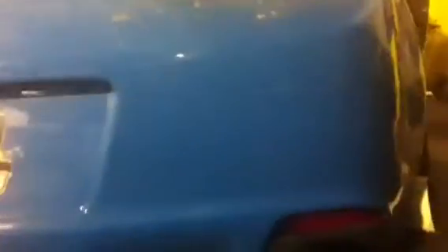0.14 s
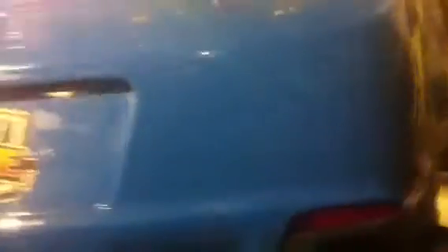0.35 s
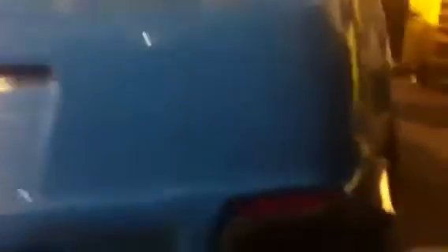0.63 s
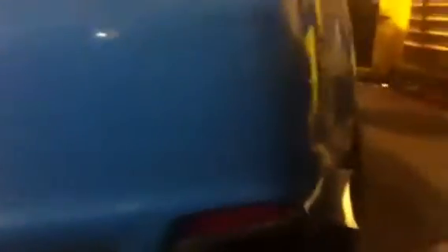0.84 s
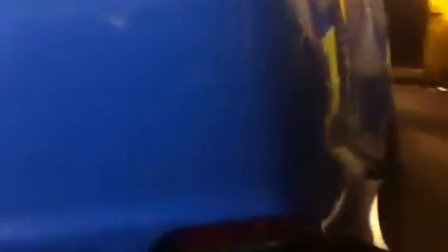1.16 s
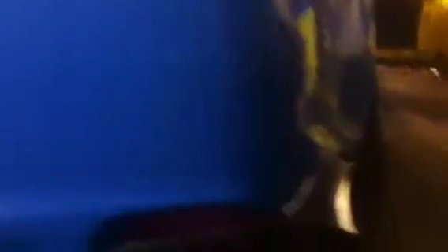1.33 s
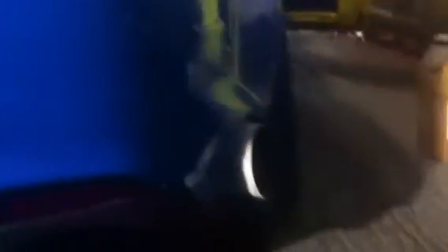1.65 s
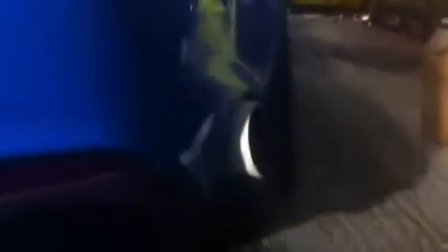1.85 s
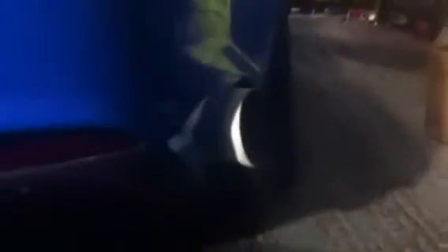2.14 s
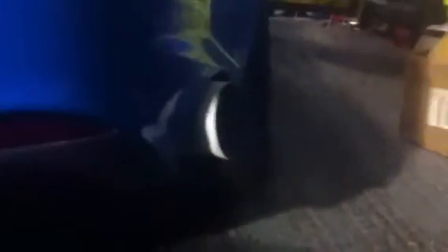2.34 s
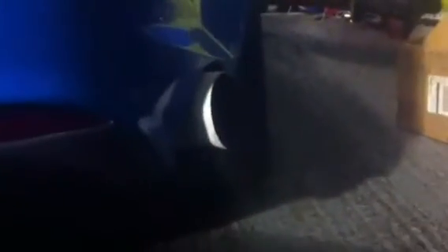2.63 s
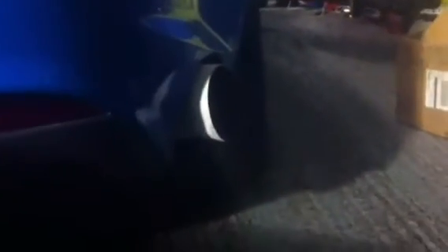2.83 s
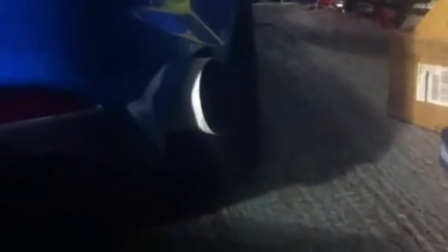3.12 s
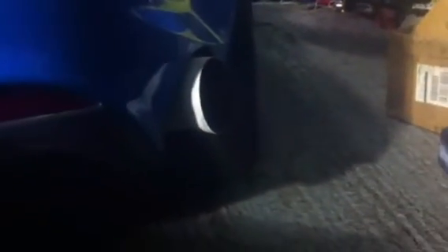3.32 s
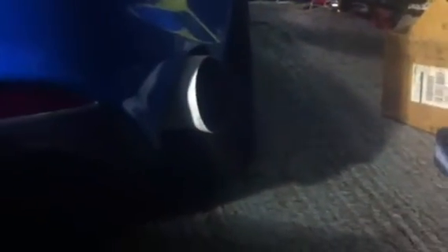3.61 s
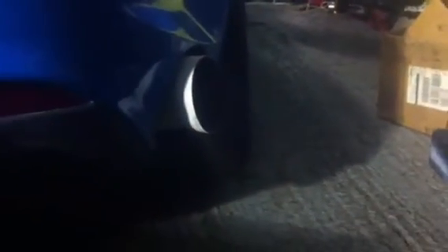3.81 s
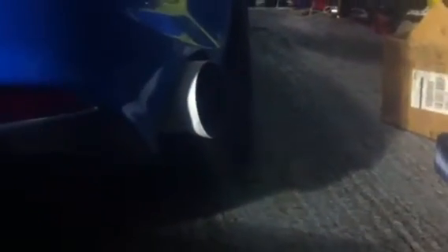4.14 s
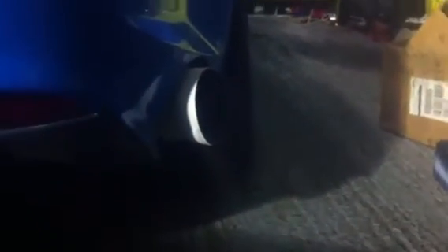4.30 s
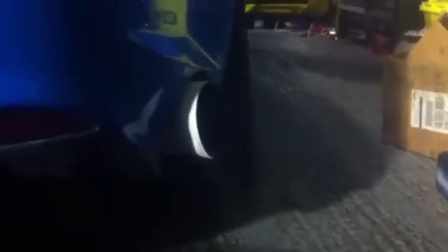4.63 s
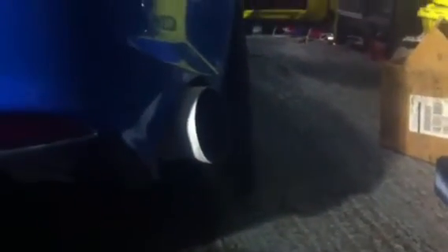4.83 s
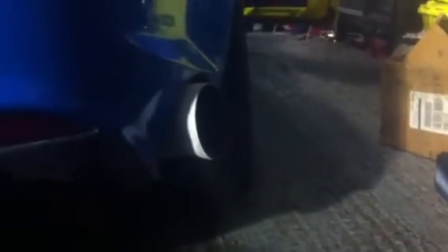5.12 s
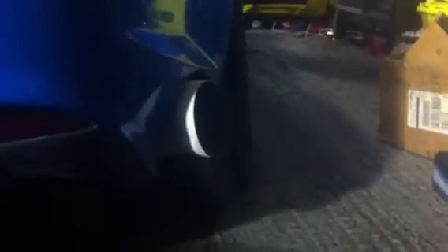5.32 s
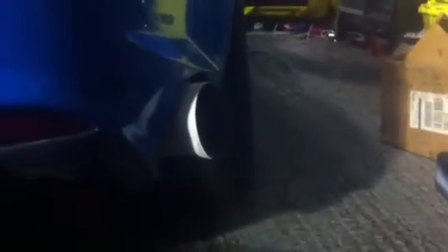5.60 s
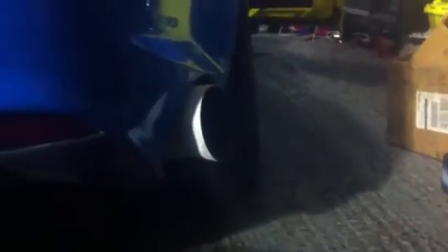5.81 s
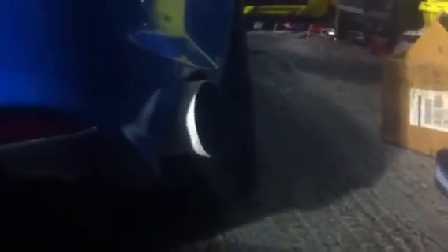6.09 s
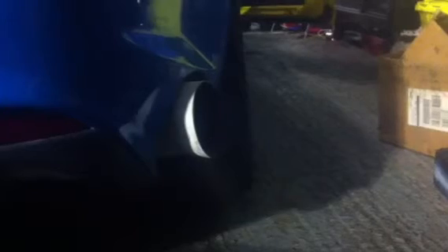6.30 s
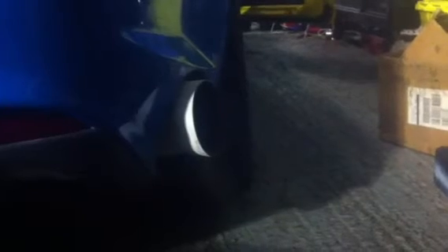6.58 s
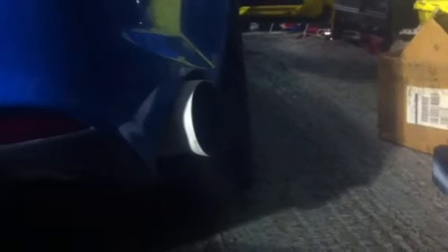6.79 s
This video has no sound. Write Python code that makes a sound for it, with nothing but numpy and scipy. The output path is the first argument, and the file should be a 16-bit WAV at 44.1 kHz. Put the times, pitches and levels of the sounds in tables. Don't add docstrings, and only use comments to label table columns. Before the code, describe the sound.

A rotary race engine idles lumpily throughout, in a concrete garage. From 0 to about 1 second the microphone is beside the car: dull, low exhaust thuds fire in quick clusters of two to four, blasts about 27 milliseconds apart, with brief skips between clusters and a hollow metallic pipe ring near 400 hertz. A soft air thump lands around 0.3. From 1 to 1.75 the microphone rounds the tail; the ring recedes and the thuds become deeper and more direct. It then stays behind the outlet until 7 seconds. The loping never settles into an even beat, stumbling notably around 3.2-3.6 and 5.3. Bright gas hiss pulses with the firing and flares irregularly, strongest near 4.5, 5.1, 5.4 and 6.3. Underneath run a noisy gear whirr with whines around 2 kilohertz, a faint wavering sheet-metal tone near 700 hertz, soft microphone buffeting and short wall reverberation. It ends still idling.

```python
import sys
import numpy as np
from scipy import signal
from scipy.fft import rfft, irfft, next_fast_len
from scipy.io import wavfile

SR = 44100
rng = np.random.default_rng(int(sys.argv[2]) if len(sys.argv) > 2 else 0)


def convert_level_to_amplitude(level_db):
    exponent = np.asarray(level_db, float) / 20
    return 10 ** exponent


def dump_mix(stems):
    frames = np.atleast_2d(stems).T
    limited = np.clip(frames, -1, 1)
    pcm = np.round(limited * 32767).astype(np.int16)
    wavfile.write(sys.argv[1], SR, pcm)


N = 306495
SLOT_S = .0137


def rms_one(x):
    return x / np.sqrt(np.mean(x ** 2) + 1e-20)


def butter(x, hz, kind, order=4):
    return signal.sosfilt(signal.butter(order, hz, kind, fs=SR, output="sos"), x)


def drift(rate):
    r = np.exp(-80 * np.pi * rate / SR)
    noise = rng.standard_normal(N // 40 + 2002)
    slow = signal.lfilter([1], [1, -2 * r, r * r], noise)[2000:]
    return np.interp(np.arange(N) / 40, np.arange(len(slow)), rms_one(slow))


def resonance(x, hz, width_hz):
    r = np.exp(-np.pi * width_hz / SR)
    feedback = [1, -2 * r * np.cos(2 * np.pi * hz / SR), r * r]
    return signal.lfilter(np.array([1, 0, -1]) * (1 - r * r) / 2, feedback, x)


def ring(x, hz, t60_s):
    r = convert_level_to_amplitude(-60 / (t60_s * SR))
    w = 2 * np.pi * hz / SR
    return signal.lfilter([0, np.sin(w)], [1, -2 * r * np.cos(w), r * r], x)


def coloured(points):
    size = next_fast_len(N)
    hz = np.maximum(np.arange(size // 2 + 1) * SR / size, 1)
    point_hz, point_db = np.array(points).T
    shape = convert_level_to_amplitude(np.interp(np.log(hz), np.log(point_hz), point_db))
    return rms_one(irfft(rfft(rng.standard_normal(size)) * shape, size)[:N])


def clicks(times, sizes):
    out = np.full(N, 1e-18)
    np.add.at(out, np.clip(np.round(times * SR).astype(int), 0, N - 1), sizes)
    return out


def bump(s, half_s):
    return np.exp(-((np.arange(N) / SR - s) / half_s) ** 2)


# time_s, place_share
WALK = [
    (0, 0.0086),
    (.8, 0.081),
    (1.2, 0.41),
    (1.5, 0.7),
    (1.75, 1),
    (6.95, 1),
]


def microphone_place():
    s, share = np.transpose(WALK)
    return np.clip(np.interp(np.arange(N) / SR, s, share), 0, 1)


# time_s, peak_db
THUMPS = [(0.317, -30), (0.602, -53), (0.766, -58), (1.05, -46), (1.216, -41), (1.326, -31.5), (1.683, -38),
          (2.229, -39), (2.418, -41), (2.74, -46), (2.811, -41), (2.97, -38), (3.127, -46), (3.366, -37),
          (3.529, -37), (3.985, -39), (4.127, -49), (4.447, -42), (4.649, -31), (5.092, -36), (5.655, -41),
          (6.002, -41), (6.314, -44), (6.718, -46)]


def buffet():
    s, db = np.transpose(THUMPS)
    push = ring(clicks(s + 0.015, convert_level_to_amplitude(db + 8)), 34, 0.075)
    rumble = butter(rng.standard_normal(N), [52, 80], "band", order=2)
    deep = butter(rng.standard_normal(N), 50, "low", order=2)
    return butter(push, 80, "low", order=2) + convert_level_to_amplitude(-56.5) * rms_one(rumble) + convert_level_to_amplitude(-60) * rms_one(deep)


# frequency_hz, density_db (per Hz)
GEAR_COLOUR = [(310, -42), (520, -2.5), (860, -0.5), (954, -7), (1120, -7.5), (2030, -7.5), (2330, -20),
               (3500, -14.5), (4550, -16.5), (7700, -120)]
# pitch_hz, width_hz, level_db
WHINES = [(1783, 23.5, -10), (2066, 75, -4.5), (1963, 113, -10), (2210, 20, -17.5), (2502, 33, -21.5),
          (3316, 29, -16), (3640, 52, -19), (8480, 76, -20.5)]


def gear(flow, behind):
    beside_db, behind_db = -36, -37
    whirr = coloured(GEAR_COLOUR)
    for hz, width_hz, db in WHINES:
        noise = rng.standard_normal(N)
        whine = resonance(resonance(noise, hz, width_hz), hz, width_hz)
        whirr = whirr + convert_level_to_amplitude(db) * rms_one(whine)
    level_db = beside_db + (behind_db - beside_db) * behind
    return convert_level_to_amplitude(level_db + 2.5 + 1.27 * drift(29)) * whirr * (0.58 + 0.072 * flow)


# time_s, peak_db, half_length_s
SWELLS = [(0.154, -50, 0.15), (0.573, -45, 0.027), (.68, -47, 0.022), (1, -52, 0.14), (1.223, -49, .03),
          (1.36, -50, 0.045), (1.76, -37, .1), (1.953, -53, 0.031), (2.26, -43, 0.11), (2.482, -44, 0.052),
          (2.61, -39, 0.026), (2.706, -39, 0.033), (3.02, -42, .035), (3.238, -38, 0.11),
          (3.697, -41.5, 0.029), (3.917, -43, 0.025), (4.032, -47, .04), (4.24, -41.5, 0.08),
          (4.5, -37, 0.084), (4.73, -42, 0.027), (5.003, -36, 0.093), (5.2, -41, 0.032),
          (5.367, -38.5, 0.067), (5.787, -44.5, 0.13), (6.044, -46, 0.068), (6.266, -41.5, 0.085),
          (6.41, -37, 0.079), (6.636, -44, 0.056), (6.828, -38, 0.055)]


def panel():
    pitch_hz, rest_db = 713, -55
    wobble_hz = 5.0 * drift(14)
    tone = np.sin(2 * np.pi * np.cumsum(pitch_hz + wobble_hz) / SR)
    swell = convert_level_to_amplitude(rest_db) + sum(convert_level_to_amplitude(db) * bump(s, half_s) for s, db, half_s in SWELLS)
    return swell * convert_level_to_amplitude(6.5 + 2.0 * drift(21)) * tone


def garage(x):
    t60_s, level_db = .4, -14
    t = np.arange(SR // 2) / SR
    build_up = np.clip((t - .012) / 0.13, 0, 1)
    tail = rng.standard_normal(len(t)) * convert_level_to_amplitude(-60 * t / t60_s) * build_up
    return convert_level_to_amplitude(level_db) * signal.fftconvolve(x, tail / np.sqrt(np.sum(tail ** 2)))[:N]


def gas_flow(times, sizes):
    t = np.arange(8192) / SR
    puff = np.exp(-(t / .028) ** 1.5) - np.exp(-t / .0012)
    flow = signal.fftconvolve(clicks(times - .004, sizes), puff)[:N]
    return np.maximum(flow, 0) / flow.mean()


def flare(s):
    rise_s, fall_s = 0.0023, 0.043
    t = np.maximum(np.arange(N) / SR - s, 0)
    return np.exp(-t / fall_s) - np.exp(-t / rise_s)


# frequency_hz, density_db (per Hz)
JET_COLOUR = [(1410, -4), (2400, -4), (3080, -10.5), (3410, -7), (4420, -6.5), (5910, 1), (7300, -3),
              (8730, -2.5), (13000, -6.5), (15600, -13.5)]
# pitch_hz, width_hz, level_db
TIP_PEAKS = [(3470, 680, -4), (6010, 1450, -12), (8680, 1340, -3), (11700, 1500, -11.5)]
# time_s, change_db
GUSTS = [(.07, -0.5), (.9, -1.5), (1.43, 1), (1.9, -0.5), (2.35, -3.5), (2.52, -2), (2.71, -2.5),
         (3.05, -2), (3.49, -4), (4.2, -4), (4.58, -1.5), (5.14, -3.5), (5.4, -0.5), (5.5, -3)]
# start_s, peak_db
FLARES = [(0.7512, -24.5), (1.076, -21), (1.2361, -21.5), (1.732, -22), (1.9919, -23), (2.3775, -23),
          (2.5386, -22), (2.7307, -21.5), (2.829, -25.5), (3.0924, -27), (3.3468, -24), (3.5149, -22.5),
          (3.9444, -24.5), (4.2208, -24), (4.5027, -18), (4.8703, -23.5), (5.0599, -18.5), (5.437, -17),
          (5.5139, -27), (5.6116, -25), (5.7743, -26), (6.132, -24), (6.317, -19), (6.4083, -22),
          (6.7391, -25.5), (6.9057, -26.5)]


def jet(flow):
    jet_db, gust_s = -34, 0.026
    flare_from_db, flare_share = -27.5, 0.8
    noise = coloured(JET_COLOUR)
    tip = sum(convert_level_to_amplitude(db + 4.4 * drift(12.5)) * resonance(noise, hz, width_hz) for hz, width_hz, db in TIP_PEAKS)
    low = butter(noise, 9000, "low", order=2)
    gusty = (noise - low + tip) * (.35 + flow ** .8)
    gusty += low * convert_level_to_amplitude(1.5 * drift(8)) * (1.2 + .3 * flow)
    level_db = jet_db + sum(db * bump(s, gust_s) for s, db in GUSTS)
    level_db += sum(flare_share * max(db - flare_from_db, 0) * flare(s) for s, db in FLARES)
    return convert_level_to_amplitude(level_db + 0.79 * drift(19.0)) * rms_one(gusty)


def burst(count, first_db, last_db, middle_db):
    levels = np.linspace(first_db, last_db, count)
    levels[1:-1] += middle_db
    return list(levels)


def opening(first, count, first_db, last_db):
    middle_db, masked_db, beside_until_s = -.3, -3, 1.45
    if first < beside_until_s and count == 3:
        middle_db += masked_db
    return burst(count, first_db, last_db, middle_db)


PICKUP = .045


def lope(first, last, opening_db, settled_db, doubled):
    surge, surge_slots, coast = .075, 7, .012
    sag_db, middle_db = -.8, -2.2
    slots = (last - first) / SLOT_S
    shapes = [(count, more) for count in (2, 3, 4) for more in range(1, 6)]
    count, more = min(shapes, key=lambda s: abs(2 * s[0] - 2 + 7 * s[1] - slots))
    fires = np.array([1, 0] * count + [0] + [1, 0, 1, 0, 1, 0, 0] * more)[:-2]
    skipped = np.array([0, 0] * (count - 1) + [1, 1, 1, 0, 0, 0, 0] * more)
    slot = np.arange(len(skipped))
    length = 1 + coast * skipped
    if doubled:
        length = length - surge * np.exp(-slot / surge_slots) + PICKUP * (slot < 2)
    clock = np.cumsum([0, *length])
    times = first + (last - first) * clock[fires == 1] / clock[-1]
    levels = opening(first, count, opening_db, opening_db + sag_db)
    levels += burst(3, settled_db, settled_db, middle_db) * more
    return list(times), levels


# time_s, level_db
JOINS = [
    (3.3918, -5.3),
    (3.559, -5.5),
    (5.2956, -6.7),
]
# first_blast_s, last_blast_s, opening_db, settled_db
LOPES = [(.1735, .3299, -4.6, -4.4), (.3434, .5824, -6.5, -6), (.6233, .7788, -4.6, -6),
         (.793, .9777, -6, -5.5), (1.0889, 1.3361, -5, -4.9), (1.5454, 1.6959, -5.5, -4.9),
         (1.8025, 1.9524, -6, -4), (1.9948, 2.2462, -3.5, -4.5), (2.4469, 2.5951, -4.8, -5.4),
         (2.7334, 2.9867, -4.2, -4.8), (2.9999, 3.1466, -6.2, -5.5), (3.6517, 3.8047, -5.6, -6.4),
         (3.8483, 4.0024, -4.5, -4.6), (4.2209, 4.3726, -4.5, -4.3), (4.6778, 4.831, -5.6, -4.6),
         (4.8725, 5.0217, -4, -3.4), (5.4161, 5.6682, -4.5, -4.5), (5.6814, 6.1219, -6.8, -4.8),
         (6.1347, 6.3724, -5.6, -4.2), (6.3855, 6.5351, -4.6, -4.1), (6.5485, 6.7972, -5.3, -4.7),
         (6.8103, 6.9605, -5.9, -3.5)]
# first_blast_s, last_blast_s, first_db, last_db
LONE = [(.0029, .0601, -4.5, -7.5), (.0744, .1596, -6, -7.5), (.9918, 1.0758, -4.4, -5),
        (1.3492, 1.4033, -5, -9.5), (1.4738, 1.532, -8.5, -12), (1.7093, 1.7899, -4.8, -4.9),
        (2.2592, 2.3111, -4.2, -6.5), (2.3782, 2.4334, -5.2, -7.5), (2.6089, 2.6917, -7.5, -3.5),
        (3.1595, 3.2119, -5.3, -6), (3.2513, 3.2782, -5.2, -5.2), (3.349, 3.4058, -4, -8.5),
        (3.4196, 3.4464, -8.7, -5), (3.5165, 3.5726, -4.8, -8.5), (3.5862, 3.6122, -7.9, -6.5),
        (4.0153, 4.0929, -5.4, -7.2), (4.1049, 4.1553, -7, -9.5), (4.3861, 4.4677, -4.8, -3.5),
        (4.4804, 4.5345, -4.9, -4.8), (4.6061, 4.6645, -5.3, -5.9), (5.0346, 5.1159, -5, -6),
        (5.129, 5.1824, -5, -8), (5.2525, 5.3091, -7, -8), (5.3231, 5.3761, -3.6, -6)]


def firings():
    scatter_db = .4
    times, levels = map(list, zip(*JOINS))
    for row in LOPES:
        doubled = any(0 < row[0] - other[1] < 2 * SLOT_S for other in LOPES + LONE)
        s, db = lope(*row, doubled)
        times, levels = times + s, levels + db
    for first, last, first_db, last_db in LONE:
        count = round((last - first) / (2 * SLOT_S)) + 1
        step = np.linspace(0, 1, count)
        times += list(first + (last - first) * (step + PICKUP * step * (1 - step)))
        levels += opening(first, count, first_db, last_db)
    levels = levels + scatter_db * rng.standard_normal(len(levels))
    heard = np.array(times) < N / SR
    return np.array(times)[heard], convert_level_to_amplitude(levels)[heard]


def blast():
    puff = np.sin(np.pi * np.clip(np.arange(8192) / (.0008 * SR), 0, 1)) ** 2
    bass_cut = signal.cheby2(8, 48, 71, "high", fs=SR, output="sos")
    shape = signal.sosfilt(bass_cut, butter(puff, 262, "low", order=6))
    return shape / shape.max(), np.argmax(shape)


# delay_s, beside_share, behind_share
ECHOES = [
    (0, .83, 1.02),
    (.0046, .72, .34),
    (.0092, .2, .03),
    (.0129, .02, .19),
    (.0183, .05, .19),
    (.0376, .01, .1),
    (.0462, .05, .05),
    (.0501, 0, .07),
]
# pitch_hz, width_hz, beside_share, behind_share
CHAMBERS = [
    (105, 25, .05, -.45),
    (208, 14, .46, -.78),
    (286, 40, -.7, -.27),
]
# pitch_hz, t60_s, beside_db, behind_db
PIPE_MODES = [(102.7, 0.16, -38, -29.5), (325, 0.3, -34.5, -34.5), (391.2, 0.32, -19.5, -33),
              (408.5, 0.1, -32.5, -30), (611, 0.039, -30.5, -38), (902, 0.057, -28, -54),
              (958, 0.036, -22.5, -24.5), (1008, 0.011, -29, -30)]


def exhaust(times, sizes, behind):
    shape, peak = blast()
    afterpuff_db = -19
    after_times = times + rng.uniform(.008, .022, len(times))
    after = clicks(after_times, sizes * convert_level_to_amplitude(afterpuff_db) * rng.standard_normal(len(times)))
    direct = signal.fftconvolve(clicks(times, sizes) + after, shape)[peak:peak + N]
    out = np.zeros(N)
    for delay_s, beside_share, behind_share in ECHOES:
        late = np.interp(np.arange(N) - delay_s * SR, np.arange(N), direct, left=0)
        out += (beside_share + (behind_share - beside_share) * behind) * late
    for hz, width_hz, beside_share, behind_share in CHAMBERS:
        share = beside_share + (behind_share - beside_share) * behind
        out += share * resonance(direct, hz, width_hz)
    scatter = convert_level_to_amplitude(2.4 * rng.standard_normal((len(times), len(PIPE_MODES))))
    for k, (hz, t60_s, beside_db, behind_db) in enumerate(PIPE_MODES):
        struck = ring(clicks(times - .006, sizes * scatter[:, k]), hz, t60_s)
        narrow = resonance(struck, hz, hz / 7)
        level_db = beside_db + 4.0 + (behind_db - beside_db) * behind
        out += (-1) ** k * convert_level_to_amplitude(level_db) * narrow
    return out


def scene():
    times, sizes = firings()
    flow = gas_flow(times, sizes)
    behind = microphone_place()
    thud = exhaust(times, sizes, behind)
    mix = buffet() + gear(flow, behind) + panel() + jet(flow) + garage(thud) + thud
    return mix[None]


def roll_off(x):
    return signal.sosfilt(signal.butter(12, 15500, fs=SR, output="sos"), x)


def record(dry):
    ceiling = .72
    rounded = dry / (1 + (dry / ceiling) ** 6) ** (1 / 6)
    return roll_off(rounded)


dry = scene()
out = record(dry)
dump_mix(out)
```